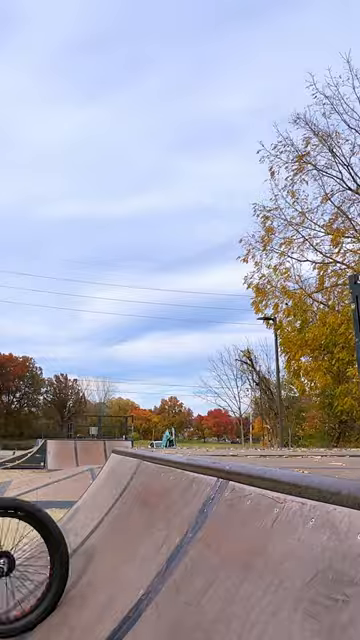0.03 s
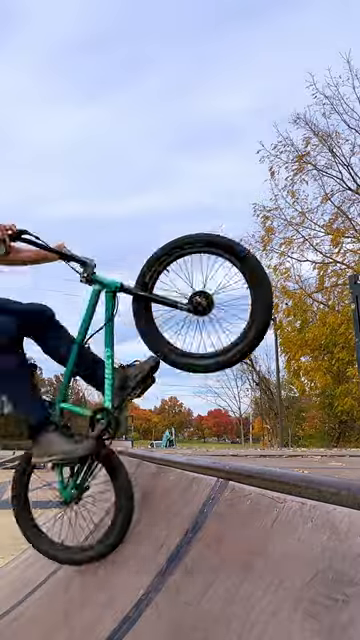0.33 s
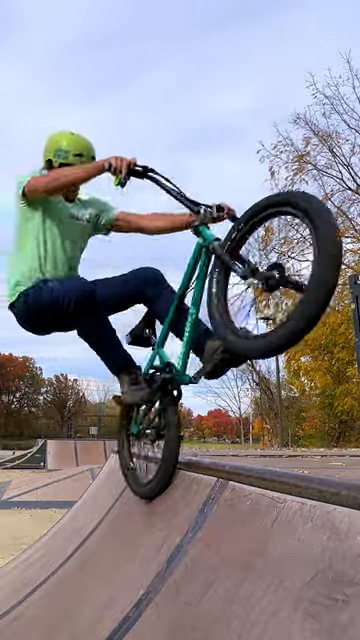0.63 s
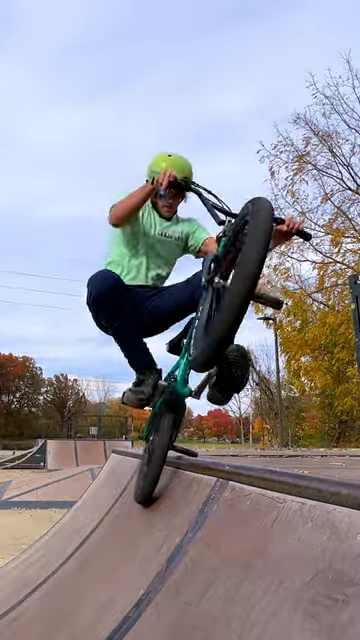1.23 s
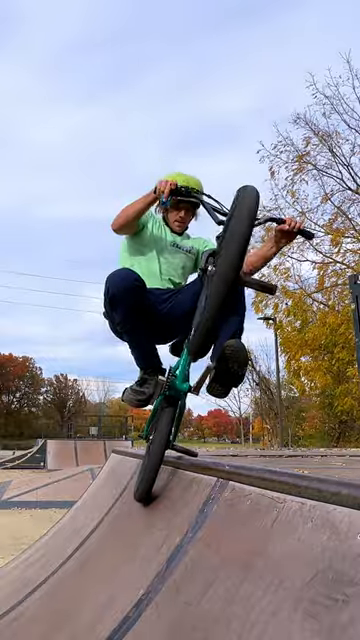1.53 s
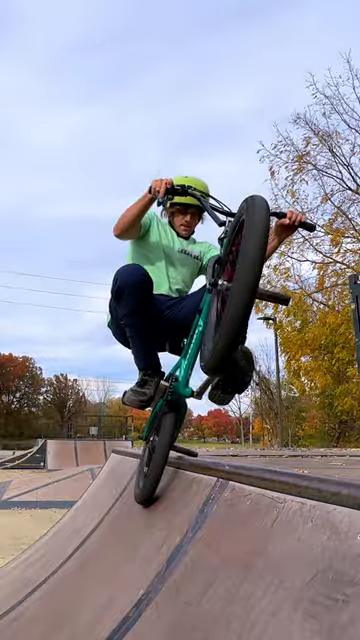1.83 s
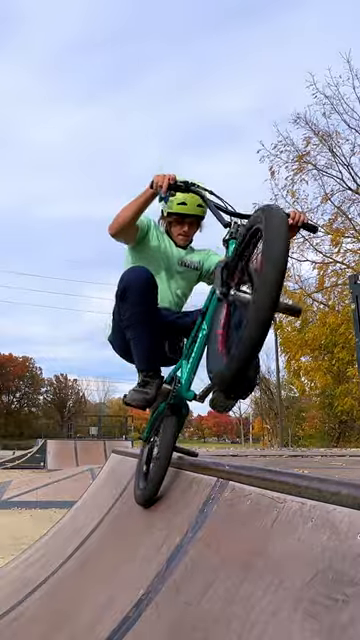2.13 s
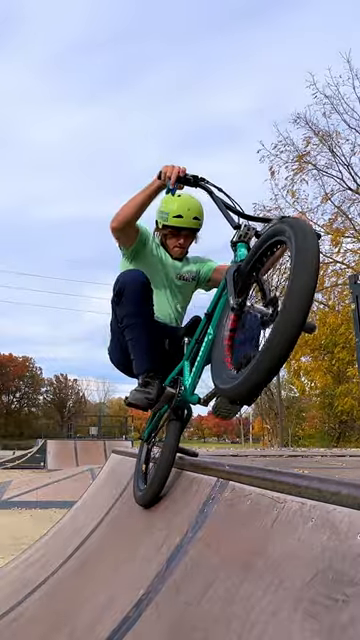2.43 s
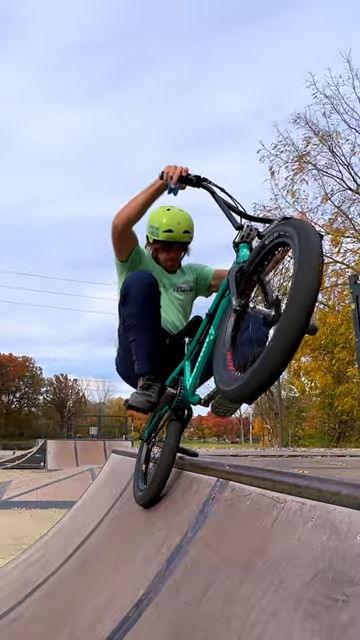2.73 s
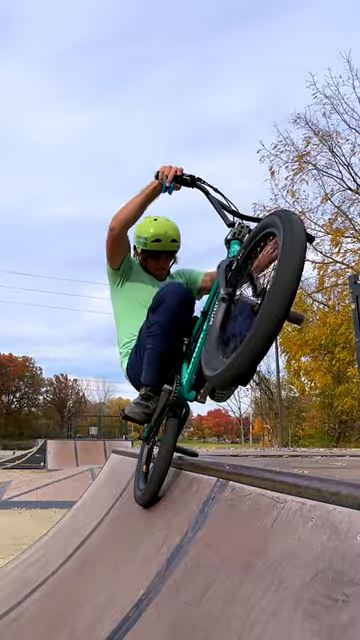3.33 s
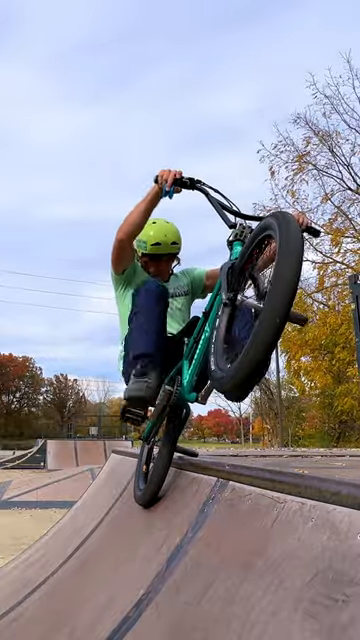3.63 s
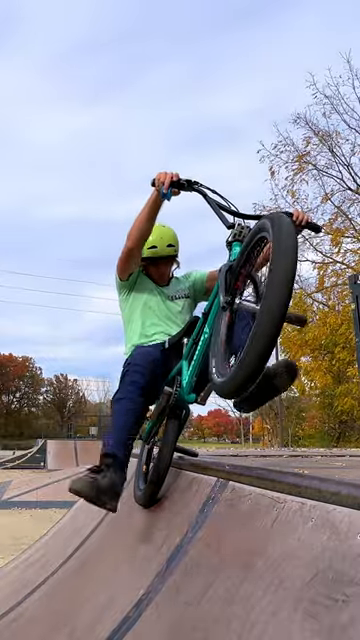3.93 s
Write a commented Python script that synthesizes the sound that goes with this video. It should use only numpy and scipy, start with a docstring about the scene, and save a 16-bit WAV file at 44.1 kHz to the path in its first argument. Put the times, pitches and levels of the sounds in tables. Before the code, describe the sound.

Close by in an outdoor skatepark, a bicycle's brake squeals briefly as it rolls up a ramp, freewheel clicking. It knocks against the edge with a hollow boom, then chain and spokes tick softly over far traffic rumble.

```python
"""A freewheel buzzes and a tyre hums as a trials bike rolls up a skatepark ramp and thumps over a seam.
The rear brake pads stick and slip in a squeal that echoes off other ramps, the tyre scuffs to a stop,
and the bike hops onto the edge with a sharp knock that booms in the hollow ramp. Chain and spokes
tick as the rider balances, over the rumble of distant traffic and a faint, leafy rustle."""
import sys
import numpy as np
from scipy import signal
from scipy.fft import rfft, irfft, next_fast_len
from scipy.io import wavfile
from scipy.ndimage import uniform_filter1d, map_coordinates

SR = 44100
rng = np.random.default_rng(int(sys.argv[2]) if len(sys.argv) > 2 else 0)


def unload_audio(sound):
    """Save the sound as a 16-bit wav file, at the path given as the first command line argument."""
    columns = np.transpose(np.atleast_2d(sound))
    # keep every value between -1 and 1, then stretch to whole-number steps
    steps = np.round(np.clip(columns, -1, 1) * 32767)
    wavfile.write(sys.argv[1], SR, steps.astype(np.int16))


N = 176400


def amp(db):
    return 10 ** (np.asarray(db) / 20)


def unit(x):
    return x / np.sqrt(np.mean(x ** 2) + 1e-20)


def clock():
    return np.arange(N) / SR


def along(points, hz):
    """Read (frequency, value) breakpoints on a log frequency axis."""
    freqs, values = np.transpose(points)
    return np.interp(np.log(hz + 1), np.log(freqs + 1), values)


def curves(rows):
    """One automation curve for each column after the time."""
    times, *columns = np.transpose(rows)
    return [np.interp(clock(), times, column) for column in columns]


def during(rows):
    """A gate, open from the first row's time to the last's."""
    return (clock() > rows[0][0]) & (clock() < rows[-1][0])


def wobble(rate):
    """Smooth random modulation, rate knots a second."""
    return map_coordinates(rng.standard_normal(N // 4), [clock() * rate], mode="wrap")


def pan(db):
    """Stereo gains with the left db above the right."""
    return amp(np.array([[db], [-db]]) / 2)


def filtered(x, response):
    """EQ x with a gain given as a function of frequency."""
    size = next_fast_len(N + SR // 4)
    return irfft(rfft(x, size) * response(np.fft.rfftfreq(size, 1 / SR)), size)[..., :N]


def noise(spectrum):
    """Coloured stereo noise of rms 1, near mono in the bass and wide on top."""
    # stereo image: f/Hz, left-right correlation
    likeness = [(40, 0.98), (130, 0.88), (260, 0.78), (500, 0.23), (1000, 0.13), (2000, 0), (5000, 0.037)]

    def mid_side_eq(hz):
        width = np.arccos(np.clip(along(likeness, hz), -1, 1)) / 2
        return amp(along(spectrum, hz)) * [np.cos(width), np.sin(width)]

    mid, side = filtered(rng.standard_normal((2, N)), mid_side_eq)
    return unit(np.array([mid + side, mid - side]))


def strike(start, attack, t60):
    """Envelope of a hit; all times in seconds."""
    age = np.maximum(clock() - start, 0)
    return (1 - np.exp(-age / attack)) * amp(-60 * np.minimum(age / t60, 4))


def ring(modes, start, attack, spread):
    """Struck, decaying modes; each channel's phases scatter by about spread radians."""
    t = np.arange(SR // 2) / SR
    tone = sum(amp(db - 60 * t / t60) * np.sin(2 * np.pi * hz * t + spread * rng.standard_normal((2, 1)))
               for hz, db, t60 in modes)
    return np.pad(tone * (1 - np.exp(-t / attack)), ((0, 0), (round(start * SR), N)))[:, :N]


def park(x):
    """Diffuse reverb of the ramps and trees."""
    # reverb time: f/Hz, t60/s
    decay = [(200, .4), (1700, 1), (4000, 0.79), (8000, 0.9), (14000, 0.27)]
    hz, t, bands = signal.stft(rng.standard_normal((2, SR)), SR, nperseg=256)
    tail = signal.istft(bands * amp(-60 * t / along(decay, hz)[:, None]), SR, nperseg=256)[1]
    return signal.fftconvolve(x, tail / np.linalg.norm(tail[0]), axes=1)[:, :N]


def freewheel(click_t60=0.043, scatter_db=3):
    """Pawls buzz over the ratchet, thinning to clicks as the wheel slows."""
    # ratchet buzz: t/s, level/dB, click rate/Hz
    coasting = [(.057, -37, 266), (.14, -38.5, 310), (.205, -41.5, 200), (.26, -62, 150), (.58, -57.5, 45),
                (.78, -74, 38)]
    # pawl colour: f/Hz, level/dB
    pawl = [(1000, -40), (2800, -9), (4000, 2.5), (5000, 2.5), (6000, -9), (7800, -30), (9200, -22),
            (11500, -50), (16000, -24)]
    db, rate = curves(coasting)
    age = np.cumsum(rate * (1 + 0.17 * wobble(60))) / SR % 1 / rate
    clicks = amp(-60 * age / click_t60 + scatter_db * wobble(90.5))
    clicks /= np.sqrt(np.abs(uniform_filter1d(clicks ** 2, size=2000)) + 1e-9)  # even rms at any rate
    return during(coasting) * amp(db) * clicks * noise(pawl) * pan(6.7)


def rolling():
    """The tread hums on the ramp, which rumbles under the load."""
    # roll-up: t/s, rumble level/dB, tread level/dB
    roll = [(.057, -19, -26), (.1, -32, -32.5), (.15, -28, -31.5), (.186, -48, -35), (.225, -22, -32),
            (.275, -28, -38), (.34, -36.5, -49), (.48, -36, -50.5), (.52, -33, -42.5), (.6, -33.5, -46.5),
            (.75, -40.5, -58), (.9, -52, -63), (1, -81, -77)]
    # ramp rumble colour: f/Hz, level/dB
    rumble = [(22, -24), (48, -3.5), (90, 0), (160, -10.5), (300, -15.5), (800, -53), (3000, -110)]
    # tread colour: f/Hz, level/dB
    tread = [(80, -30), (220, -6), (450, 2), (800, -1.5), (1200, -11.5), (2400, -15.5), (6000, -28.5),
             (15000, -46.5)]
    rumble_db, tread_db = curves(roll)
    return amp(rumble_db) * noise(rumble) + amp(tread_db + 1.3 * wobble(120)) * noise(tread)


def chain(links_per_s=100, link_t60=0.046):
    """Link after link seats on the sprocket with a thin tick."""
    # chain tinkle: t/s, level/dB
    fade = [(.057, -46.5), (.2, -50.5), (.28, -54.5), (.33, -65)]
    # link colour: f/Hz, level/dB
    link = [(5000, -20), (7800, -8), (9200, 7.5), (11500, -20), (14000, 0), (16000, -9)]
    db, = curves(fade)
    age = np.cumsum(links_per_s * (1 + 0.055 * wobble(40))) / SR % 1 / links_per_s
    return during(fade) * amp(db) * unit(amp(-60 * age / link_t60)) * noise(link)


def traffic():
    """A bed of far roads: low drone, wavering engine hum and the roar of tyres."""
    # road levels: t/s, drone/dB, roar/dB, low hum/dB, high hum/dB
    swells = [(0, -42.5, -46, -30, -41), (.8, -38, -40, -48, -40.5), (1.25, -37.5, -41, -41, -40),
              (1.7, -39, -41, -41.5, -46.5), (2.1, -42, -41, -53, -46), (2.45, -40, -41, -48, -38),
              (2.75, -39.5, -41.5, -41, -41.5), (3.1, -39.5, -40.5, -40.5, -41.5),
              (3.65, -37, -41.5, -38, -41), (4, -37.5, -41, -41.5, -42)]
    # idling engines, low and high: f/Hz
    engines = [63.4, 111.2]
    # drone colour: f/Hz, level/dB
    drone = [(24, -50), (37, -3.5), (60, -1), (85, -1.5), (115, -3), (145, -6.5), (220, -7), (350, -22),
             (700, -55), (3000, -100)]
    # tyre roar colour: f/Hz, level/dB
    roar = [(120, -23.5), (300, 0), (450, -3.5), (650, -0.5), (1050, -.5), (1500, -6.5), (2200, -16),
            (3800, -29.5), (6000, -35), (7300, -42.5), (9200, -39.5), (11000, -60)]
    drone_db, roar_db, *hums_db = curves(swells)
    hum = 0
    for hz, db in zip(engines, hums_db):
        level = amp(db + 3.6 * wobble(5.03))
        pitch = hz * (1 + 0.0256 * wobble(15))
        hum += level * np.sin(2 * np.pi * np.cumsum(pitch) / SR)
    return amp(drone_db) * noise(drone) + hum + amp(roar_db + 1.08 * wobble(5.92)) * noise(roar)


def far_hiss(centre_hz=4900, width_hz=110):
    """A thin, steady band of hiss, barely there."""
    band = filtered(rng.standard_normal((2, N)), lambda hz: np.exp(-((hz - centre_hz) / width_hz) ** 2))
    return amp(-78) * unit(band)


def bonks(t60=0.05):
    """The ramp panel answers the tyre with short hollow notes, pitched by where it is struck."""
    # panel notes: t/s, f/Hz, level/dB
    notes = [(0.2163, 265, -18), (.218, 543, -18.5), (.2235, 744, -13.5), (.2395, 888, -29),
             (.981, 226, -26.5), (.984, 950, -30), (3.494, 520, -31), (3.573, 290, -30)]
    return sum(ring([(hz, db, t60)], start, attack=.0015, spread=.35) for start, hz, db in notes)


def tyre_bounce(start, hz=97.5, rise_s=0.015):
    """The squashed tyre's dull bounce: a few cycles that swell and die."""
    age = np.maximum(clock() - start, 0)
    swell = age / rise_s
    return swell ** 2 * np.exp(2 * (1 - swell)) * np.sin(2 * np.pi * hz * age)


def thumps():
    """Each landing squashes the tyre, booms in the hollow ramp and rattles its panel."""
    # tyre landings: t/s, boom gain/dB, clatter level/dB
    landings = [(0.217, -26, -21), (0.507, -37, -34.5), (.986, -13.5, -38.5), (1.034, -29.5, -41),
                (1.155, -23, -55)]
    # ramp modes: f/Hz, level/dB, t60/s
    ramp = [(49.54, -9, 0.84), (81, -0.5, 0.37), (101, 7, 0.069), (171.5, -11.5, 0.33)]
    # panel clatter colour: f/Hz, level/dB
    panel = [(100, -28), (240, 12), (500, -1), (780, 7), (1100, -4.5), (1600, -24), (5000, -25),
             (15000, -40.5)]
    clatter = noise(panel)
    mix = 0
    for start, boom_db, clatter_db in landings:
        boom = amp(-5.5) * tyre_bounce(start) + amp(-1.5) * ring(ramp, start, attack=0.019, spread=0.24)
        mix += amp(boom_db) * boom + amp(clatter_db) * clatter * strike(start, attack=0.0028, t60=0.17)
    return mix


def brake_pad(squeal, jitter, lag_rad, rough_db=3.5):
    """A pad sticks and slips on the rim: an unsteady tone with overtones and friction hiss."""
    # 3rd harmonic upward: level/dB against the octave
    overtones = [-17.5, -11.5, -21, -16.5, -35]
    # friction colour: f/Hz, level/dB
    friction = [(900, -5), (2000, 5.5), (3600, -0.5), (6500, 4), (8000, -2.5), (10500, 0.5), (11800, -17),
                (13500, 3), (16000, -1)]
    hz, fundamental_db, octave_db = curves(squeal)
    phase = 2 * np.pi * np.cumsum(hz * (1 + jitter * wobble(700))) / SR
    levels = [fundamental_db, octave_db] + [octave_db + db for db in overtones]
    stereo_lag = lag_rad * np.array([[.5], [-.5]])
    tone = sum(amp(db + rough_db * wobble(350)) * np.sin(k * phase + stereo_lag * np.sqrt(k))
               for k, db in enumerate(levels, 1))
    hiss = amp(octave_db - 7.5 + 1.5 * wobble(600)) * noise(friction)
    return during(squeal) * (np.sqrt(2) * tone + hiss)


def near_walls(x, count=6):
    """Early reflections off the ramp, different in each channel."""
    delays = rng.uniform(.001, 0.01, (2, count))
    reflections = [sum(np.roll(channel, round(delay * SR)) for delay in row)
                   for channel, row in zip(x, delays)]
    return np.array(reflections) / np.sqrt(count)


def brake():
    """Both pads squeal; ramps near and far throw the sound back."""
    # leading pad: t/s, f/Hz, fundamental level/dB, octave level/dB
    leading = [(.271, 1520, -52, -62), (.284, 1430, -30, -41), (.29, 1400, -24.5, -21),
               (.297, 1570, -17, -20.5), (.304, 1739, -20, -28.5), (.308, 1645, -14, -17),
               (.314, 1571, -14.5, -19.5), (.323, 1601, -21.5, -18), (.333, 1632, -24, -23.5),
               (.348, 1700, -34, -40)]
    # opposite pad, joining in higher: t/s, f/Hz, fundamental level/dB, octave level/dB
    opposite = [(.3, 1807, -34, -50), (.303, 1890, -13, -28.5), (.307, 1920, -14, -37),
                (.313, 1862, -21.5, -51), (.324, 1980, -21.5, -45), (.332, 1890, -23, -53),
                (.345, 1960, -31, -57)]
    # pan of the close squeal: f/Hz, L-R/dB
    balance = [(2000, -1), (3200, -4), (4900, -3), (6500, 5), (8800, -11), (10500, -1.5)]
    # slapback off other ramps: delay/s, level/dB, L-R/dB
    slaps = [(.017, -17.5, 0), (.052, -21.5, 3), (.124, -26, 4), (0.267, -32, 5.5)]
    # echo EQ: f/Hz, gain/dB
    echo_eq = [(1700, 3.5), (3200, -12), (4100, -7), (5000, 7), (6500, -5.5), (9300, -9), (12000, -16)]
    squeal = brake_pad(leading, jitter=0.0172, lag_rad=1.0)
    squeal += brake_pad(opposite, jitter=0.01, lag_rad=0.59)
    close = squeal + amp(-12) * near_walls(squeal)
    close = filtered(close, lambda hz: amp(along(balance, hz) * np.array([[.5], [-.5]])))
    echoes = sum(amp(db) * pan(side_db) * np.roll(squeal, round(delay * SR), axis=1)
                 for delay, db, side_db in slaps)
    far = filtered(echoes + amp(-23) * park(squeal), lambda hz: amp(along(echo_eq, hz)))
    return close + far + amp(-22) * park(squeal)


def scuffs():
    """The locked tyre slides on the gritty surface in short, squeaky scrapes."""
    # slides: peak t/s, rise/s, fall/s, grit gain/dB, squeak gain/dB
    slides = [(0.493, 0.0015, 0.01, -40.5, -47), (.514, 0.0072, 0.013, -36.5, -29),
              (0.56, 0.0086, .009, -39.5, -45)]
    # grit colour: f/Hz, level/dB
    grit_colour = [(500, -2), (2400, 0), (4500, 0), (7000, -7), (9000, -3), (11500, -19), (15500, -1)]
    # rubber squeak colour: f/Hz, level/dB
    squeak_colour = [(900, -26), (1300, -9), (1550, -1.5), (1850, -7), (2200, -18.5), (2800, -19),
                     (4000, -57)]
    t = clock()
    grit = noise(grit_colour) * amp(1.5 * wobble(650))
    squeak = amp(5) * noise(squeak_colour)
    mix = 0
    for peak, rise, fall, grit_db, squeak_db in slides:
        envelope = np.exp(-np.maximum((peak - t) / rise, (t - peak) / fall))
        mix += envelope * (amp(grit_db) * grit + amp(squeak_db) * squeak)
    return pan(-2.8) * mix


def last_clicks():
    """The freewheel runs down, slow enough to hear each pawl drop."""
    # pawl drops: t/s, level/dB
    drops = [(.5415, -35.5), (.593, -47), (.62, -42.5), (.648, -49), (.6725, -49.5), (.699, -53),
             (.724, -53)]
    # click colour: f/Hz, level/dB
    click = [(3000, -10), (3900, 1), (4550, 5), (5000, -9), (5500, -22), (15000, -35)]
    return noise(click) * sum(amp(db) * strike(start, attack=0.00058, t60=.05) for start, db in drops)


def ticks():
    """Chain and spokes tick as the rider shifts his weight."""
    # small ticks: t/s, level/dB, L-R/dB, t60/s, tilt/(dB per octave)
    hits = [(.857, -58, -5, .029, 2), (1.402, -56.5, -3, .21, 0.5), (1.428, -55.5, -4, .077, -1),
            (1.662, -35.5, 10, .099, -17), (2.244, -63.5, -17, .032, 10), (3.502, -56, -1, .14, 7),
            (3.525, -56, -1, .046, 5), (3.5747, -41, 0, 0.05, -8.5), (3.592, -54.5, -2, .1, 1),
            (3.625, -56, 6, .1, -1)]
    # tick colour before the tilt: f/Hz, level/dB
    colour = [(800, -8), (2600, 5), (4500, 4), (6200, -7), (9000, -5), (11500, -23), (15000, -22)]
    mix = 0
    for start, db, side_db, t60, tilt in hits:
        tilted = [(hz, band_db + tilt * np.log2(hz)) for hz, band_db in colour]
        mix += amp(db) * pan(side_db) * noise(tilted) * strike(start, attack=0.00043, t60=t60)
    return mix


def knocks():
    """A hard contact snaps, scatters off the ramp, rings the frame and sets loose metal tinkling."""
    # metal knocks: t/s, gain/dB, L-R/dB
    hits = [(0.9779, -22.5, -4.5), (0.983, -36.5, 6), (3.572, -42, 1), (3.578, -44.5, -4)]
    # bike frame modes: f/Hz, level/dB, t60/s
    frame = [(1430, -7, .05), (1806, -5, .04), (2256, -5, .06), (2520, -1, .06), (4484, -5, .05),
             (8102, -12, .05), (14350, -19, .1), (15400, -16, .08)]
    # crack scattering off the ramp: f/Hz, level/dB
    crack_colour = [(200, 3), (1000, 9), (2700, 2.5), (3500, -9.5), (8500, -17), (11500, -32)]
    # contact snap: f/Hz, level/dB
    snap_colour = [(300, -12.5), (1200, 2.5), (2800, 7.5), (3800, -10.5), (8500, -10), (12000, -24)]
    # loose metal: f/Hz, level/dB
    tinkle_colour = [(3000, -25), (8500, 1), (11500, -16), (14300, -3)]
    crack, snap, tinkle = noise(crack_colour), noise(snap_colour), noise(tinkle_colour)
    mix = 0
    for start, db, side_db in hits:
        knock = amp(-8.5) * ring(frame, start, attack=0.00028, spread=0.61)
        knock += amp(2) * snap * strike(start, attack=.0001, t60=0.014)
        knock += amp(-6.5) * crack * strike(start, attack=.0004, t60=0.17)
        knock += amp(-15) * tinkle * strike(start, attack=.003, t60=.07)
        mix += amp(db) * pan(side_db) * knock
    return mix


def rustle():
    """A faint, high flutter, like dry leaves."""
    # rustle swells: t/s, level/dB
    swells = [(1.5, -82.5), (1.78, -73), (2.1, -78), (2.7, -70), (3.2, -77), (3.4, -86)]
    # rustle colour: f/Hz, level/dB
    leaves = [(3000, -6), (6000, 2), (9000, 6), (11000, -14), (16000, -25)]
    db, = curves(swells)
    return amp(db + 1.2 * wobble(25)) * noise(leaves)


def scene():
    """The bike's small sounds, with a touch of reverb, join the brake, the ramp and the background."""
    bike = scuffs() + knocks() + ticks() + freewheel() + last_clicks() + chain()
    foreground = brake() + bike + amp(-20) * park(bike) + rolling() + thumps() + bonks()
    return foreground + traffic() + far_hiss() + rustle()


def record(dry, start_s=.057, ceiling_db=-1.5, top_hz=15850):
    """The sound cuts in from silence, soft-clipped and then low-passed."""
    gated = dry * (clock() > start_s)
    rounded = gated / (1 + np.abs(gated / amp(ceiling_db)) ** 8) ** (1 / 8)
    return filtered(rounded, lambda hz: hz < top_hz)


dry = scene()
out = record(dry)
unload_audio(out)
```